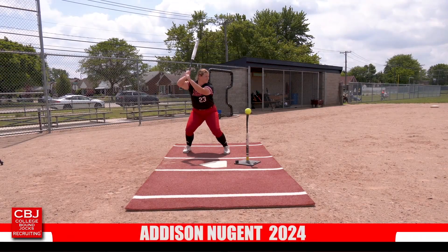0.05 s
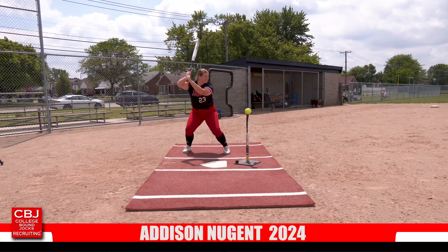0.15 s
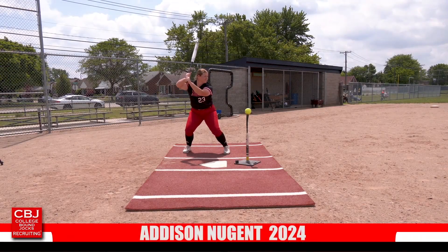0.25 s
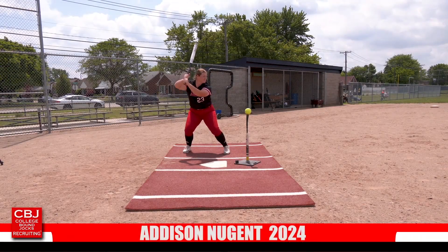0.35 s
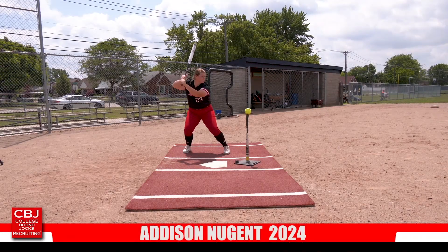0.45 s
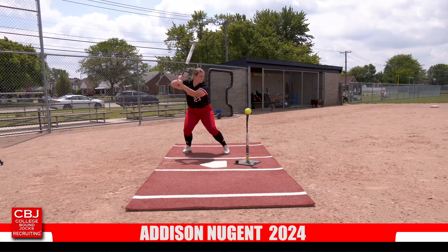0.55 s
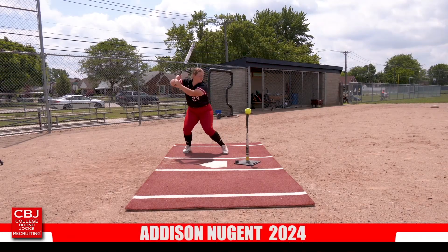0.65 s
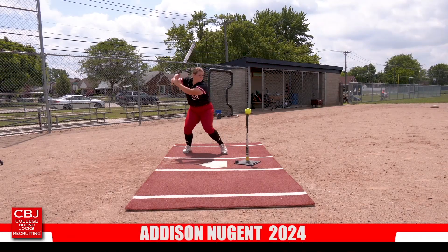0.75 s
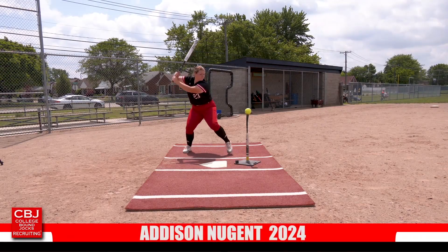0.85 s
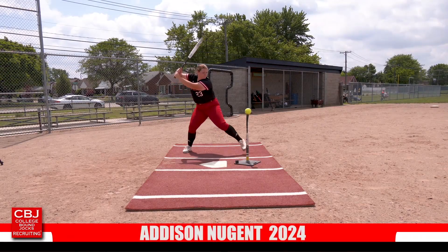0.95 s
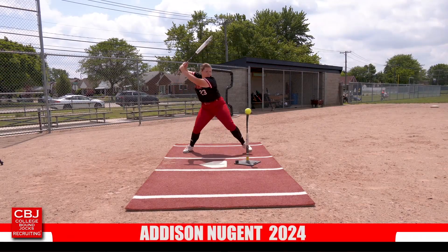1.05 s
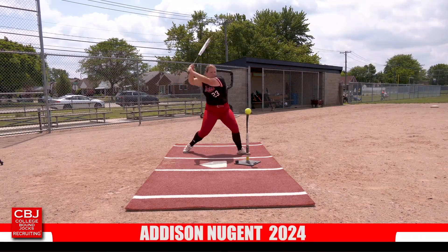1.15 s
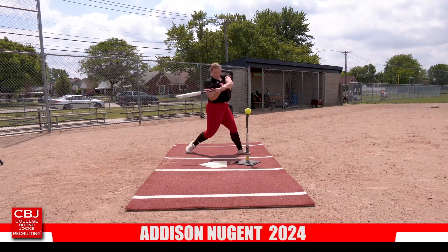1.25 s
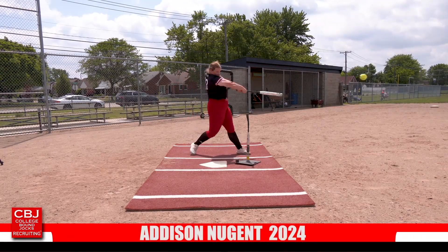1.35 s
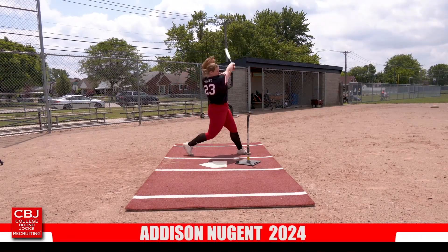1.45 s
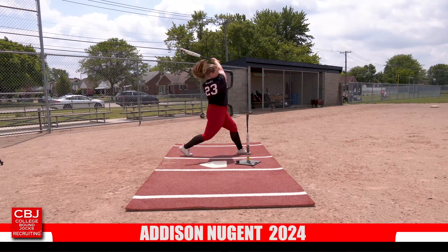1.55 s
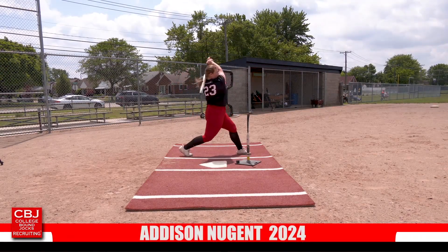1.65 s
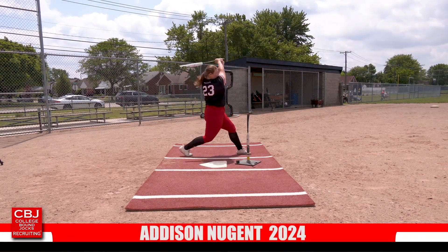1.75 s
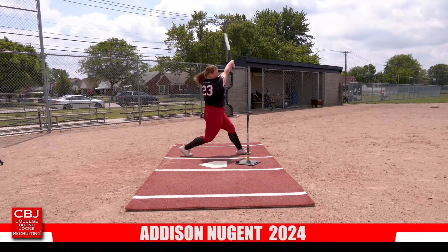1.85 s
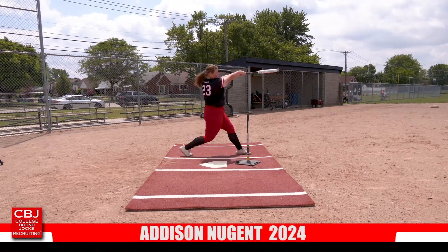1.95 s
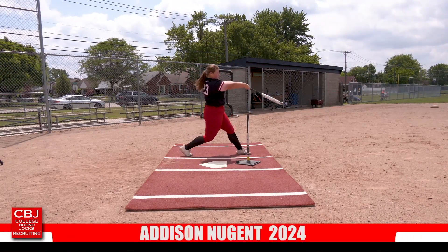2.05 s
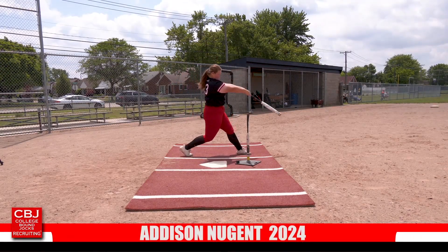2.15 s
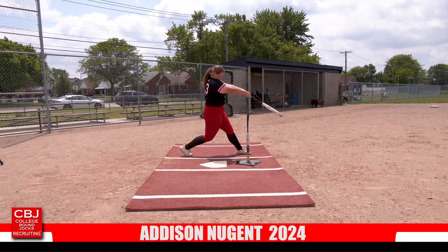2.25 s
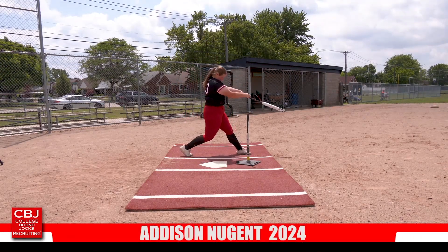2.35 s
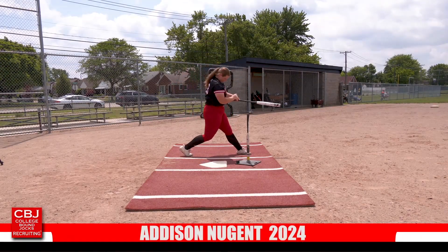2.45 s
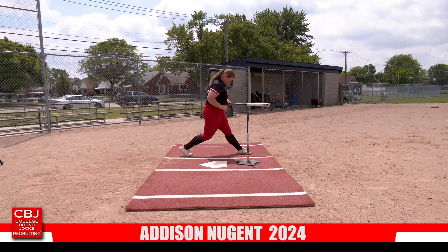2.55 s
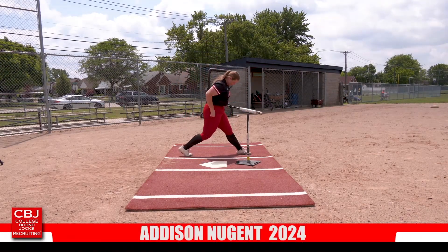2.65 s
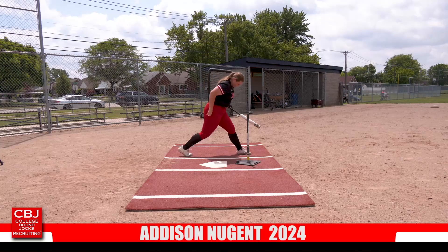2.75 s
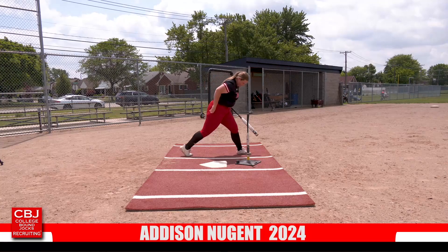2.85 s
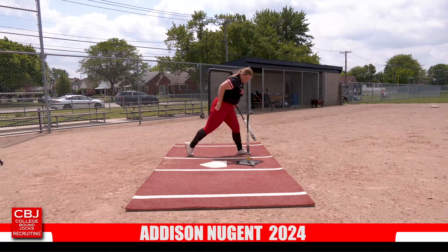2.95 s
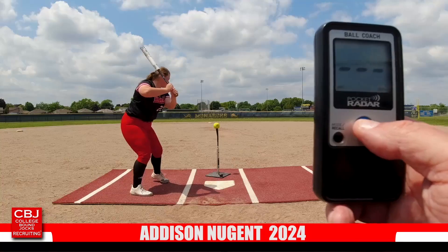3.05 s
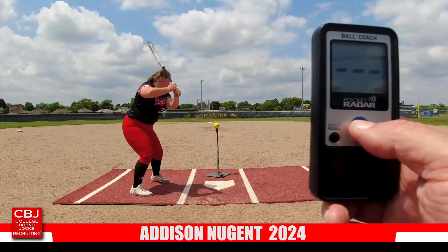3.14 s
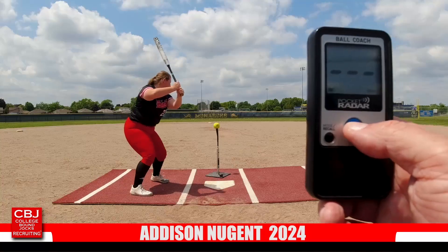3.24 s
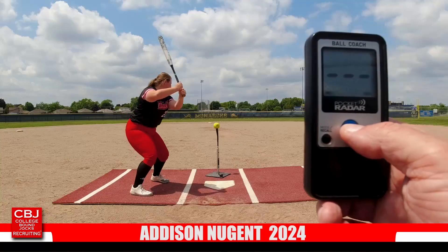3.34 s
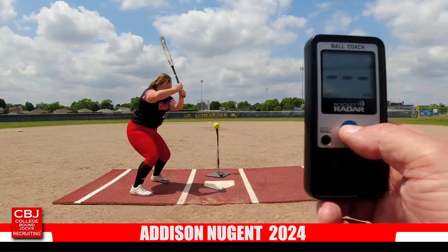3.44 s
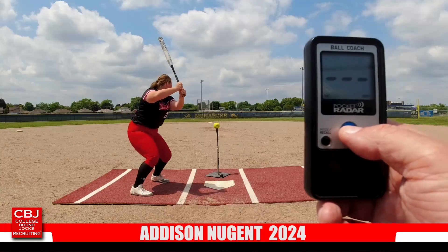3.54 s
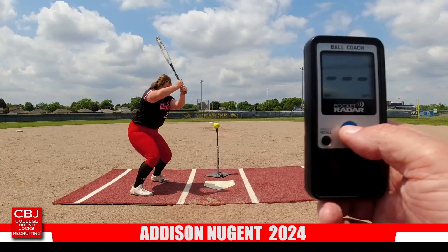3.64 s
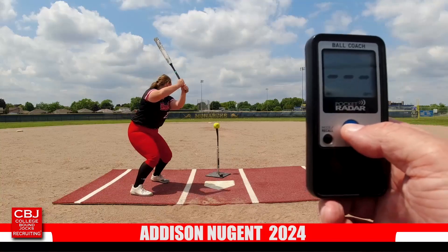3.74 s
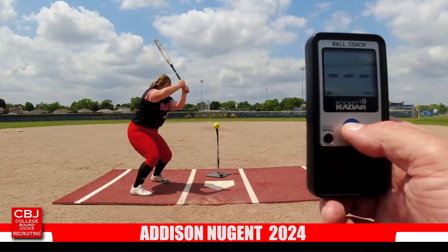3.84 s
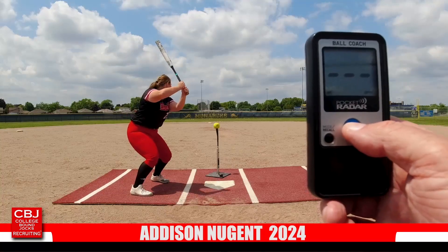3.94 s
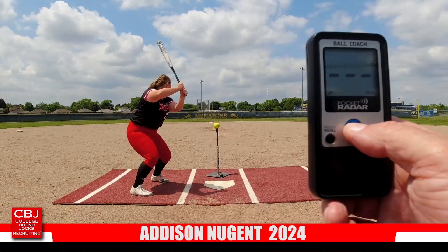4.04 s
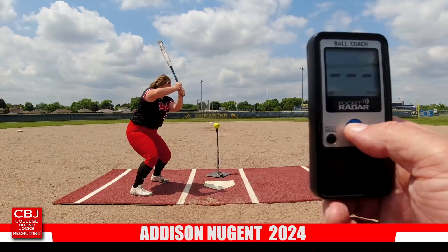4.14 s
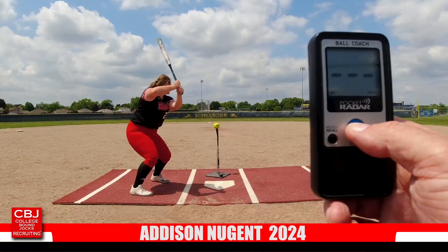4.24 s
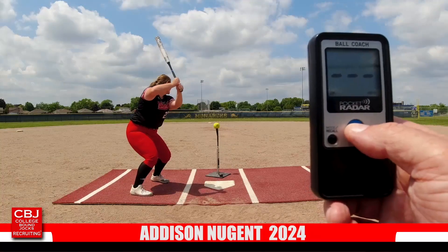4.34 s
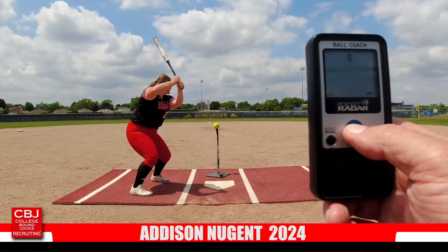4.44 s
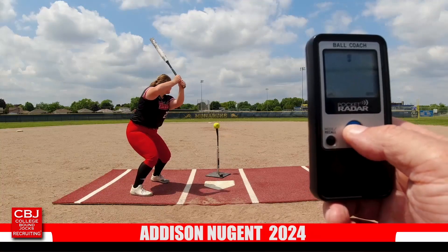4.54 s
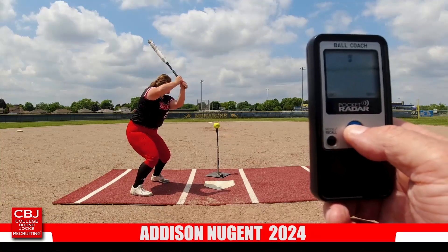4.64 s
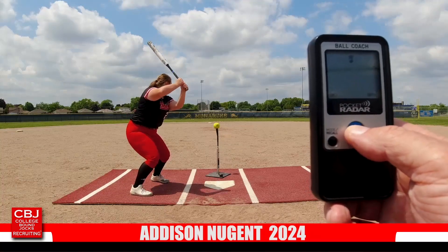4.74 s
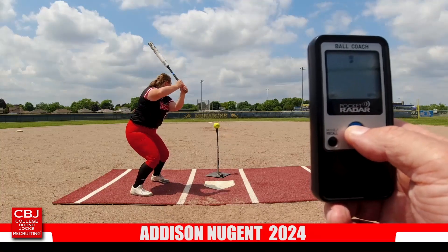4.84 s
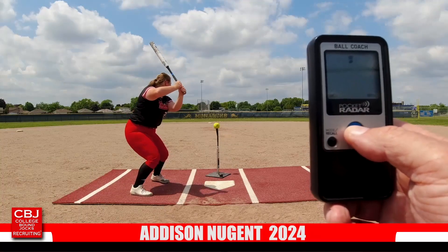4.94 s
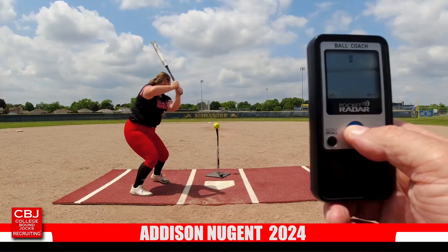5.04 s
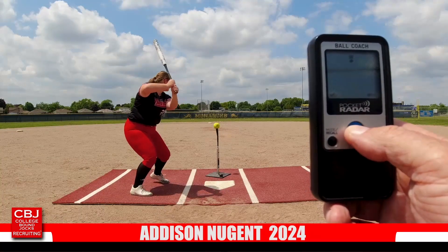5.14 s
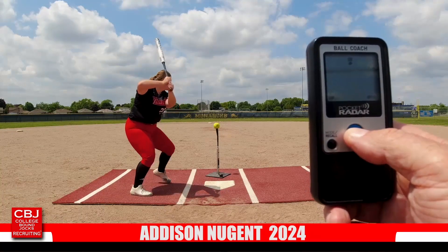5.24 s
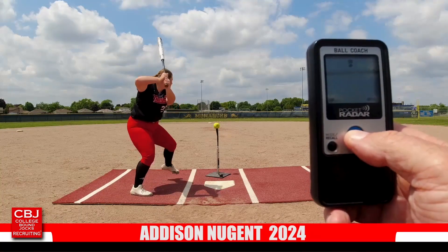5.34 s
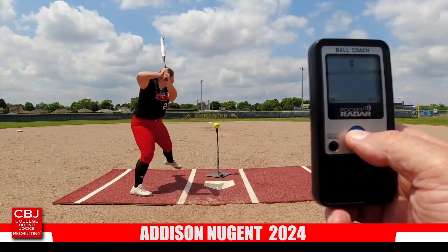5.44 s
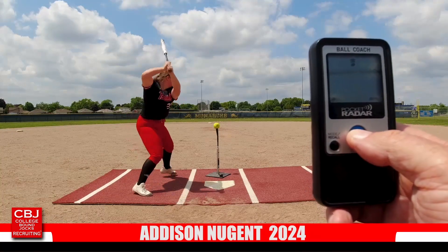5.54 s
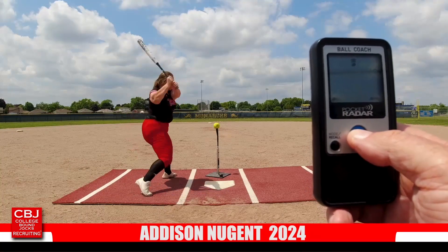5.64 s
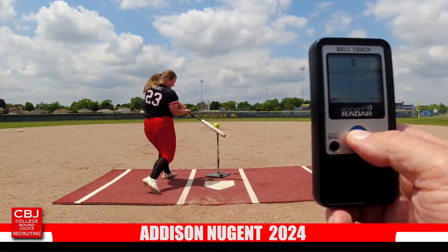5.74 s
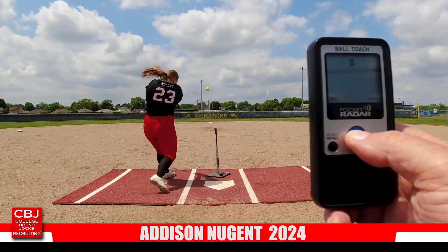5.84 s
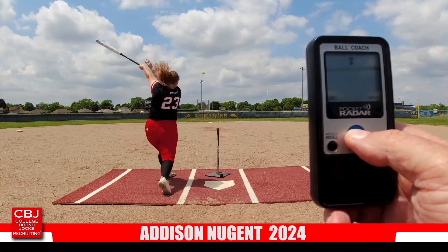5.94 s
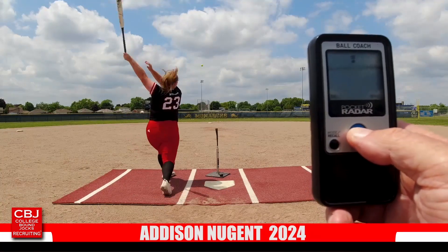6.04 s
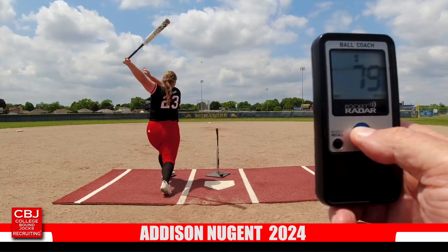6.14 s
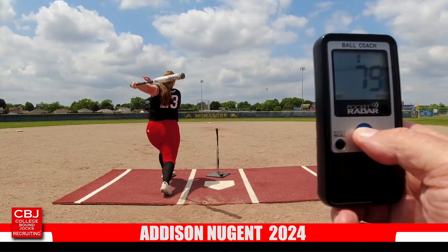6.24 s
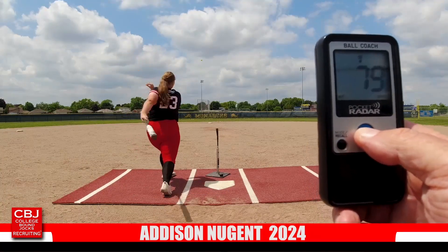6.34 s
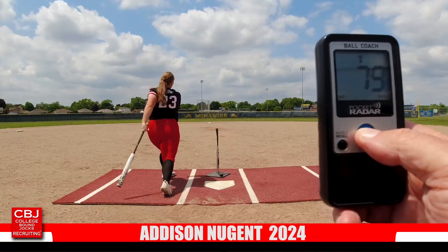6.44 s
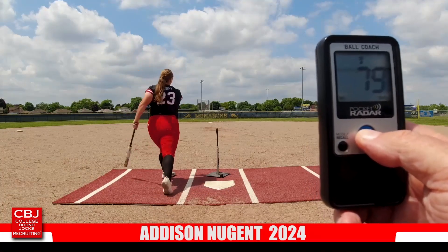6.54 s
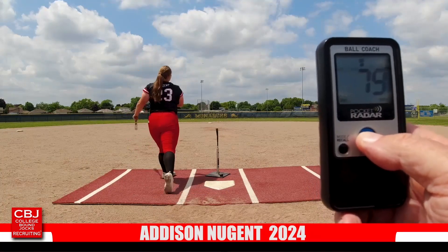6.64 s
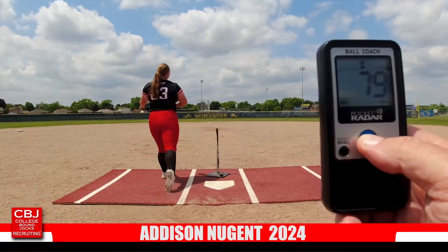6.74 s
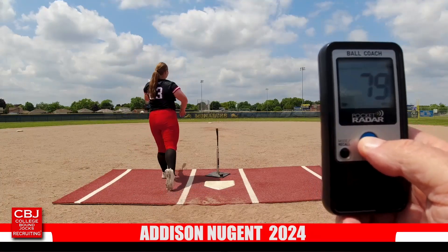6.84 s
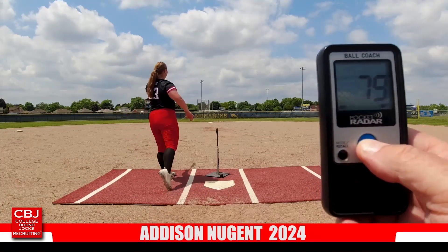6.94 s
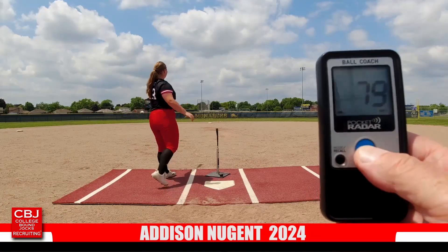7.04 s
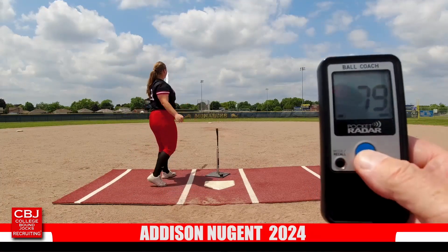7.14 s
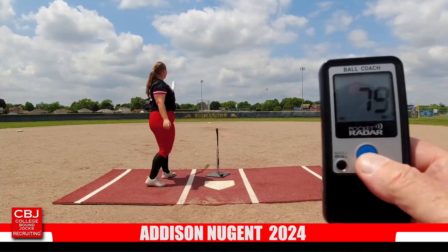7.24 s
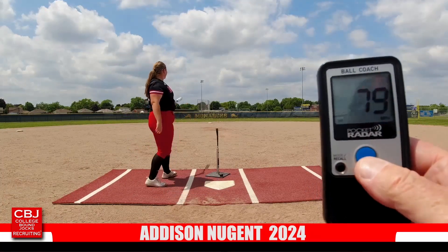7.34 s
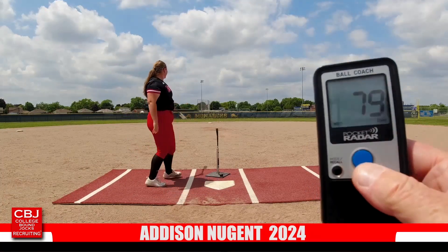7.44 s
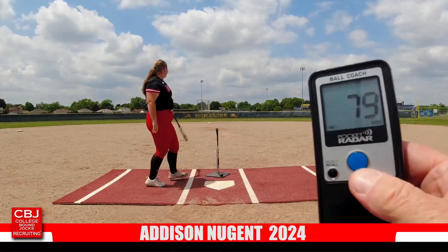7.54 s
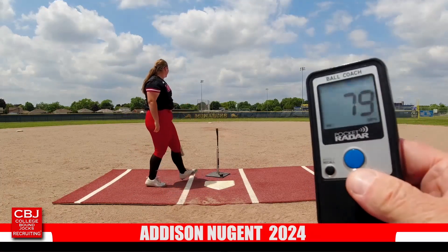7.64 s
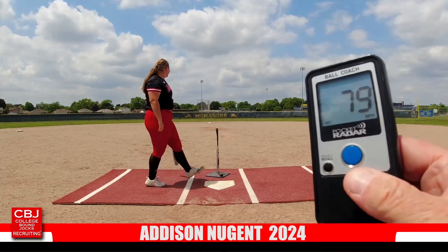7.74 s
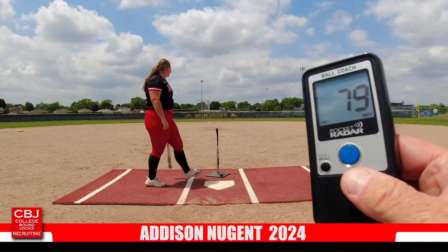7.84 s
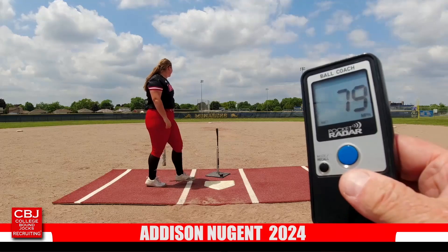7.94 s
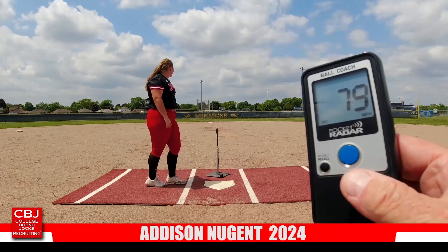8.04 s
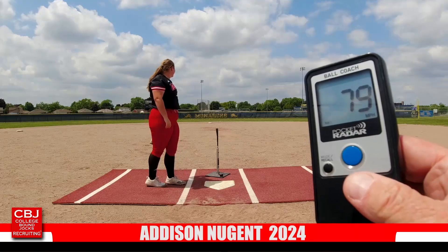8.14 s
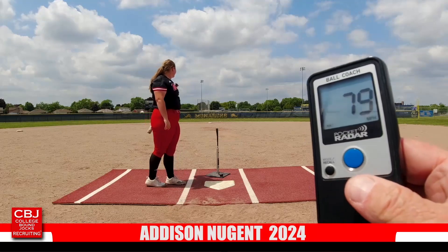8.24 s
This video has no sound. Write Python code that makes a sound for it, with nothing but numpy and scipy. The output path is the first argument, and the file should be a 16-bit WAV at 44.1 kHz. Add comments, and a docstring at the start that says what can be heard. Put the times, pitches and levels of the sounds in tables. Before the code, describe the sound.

Outdoors, a nearby batter rustles and scuffs, then strikes a ball with a sharp hollow crack that slaps back from a wire fence and ribbed wall. Aircraft rumble dies away, leaving soft traffic, leaf rustle and hiss. Birds call more often before and after a second, less pinging hit. Light ticks follow, and late gusts buffet the microphone's two sides unevenly.

```python
"""A bat cracks a softball off a tee twice on an open field: ringing modes plus bursts of coloured noise.
A wire fence, a ribbed shelter wall and far buildings answer with short tones and dulled copies of the crack.
An aircraft fades over distant traffic, both made of shaped noise; birds whistle and chirp as gliding tones.
Shoes and clothes tick and rustle as noise, and late gusts thump the two microphone ports with low pulses."""
import sys
import numpy as np
from scipy import signal
from scipy.fft import rfft, irfft, next_fast_len
from scipy.io import wavfile
from scipy.ndimage import uniform_filter1d, map_coordinates

SR = 44100
rng = np.random.default_rng(int(sys.argv[2]) if len(sys.argv) > 2 else 0)


def store_wav(level_fs):
    """Save 16-bit WAV to argv[1]."""
    pcm = np.round(np.clip(np.atleast_2d(level_fs), -1, 1) * 32767)
    wavfile.write(sys.argv[1], SR, pcm.T.astype(np.int16))


N = 365324

# In all tables t60_s is the time in which a sound falls by 60 dB.
# The two bat blows: start_s, barrel_db, overtones_db, shell_ping_db, crack_db, fence_slap_db, fence_ring_db,
# scatter_db, field_tail_db
BLOWS = [(1.3672, -9, -3, 1.5, -15, -17, -20.5, -42.5, -39),
         (5.8214, -9.5, -1, -14, -14.5, -13.5, -38, -40, -38)]
# How alike far noise is at left and right: pitch_hz, likeness (1 = the same)
ALIKE = [(60, 1.0), (180, 1.0), (550, 1), (1650, 0.96), (4970, 0.78), (15000, -0.16)]
# Turns one row into opposite values for left and right
LEFT_RIGHT = np.array([[1], [-1]])


def amp(db):
    """Gain of a level in dB."""
    return 10 ** (np.asarray(db) / 20)


def unit(x):
    """Scales x to an average strength (rms) of 1."""
    return x / np.sqrt(np.mean(x ** 2) + 1e-20)


def along(points, hz):
    """Reads a curve of (Hz, value) points on a logarithmic pitch axis."""
    f, v = np.transpose(points)
    return np.interp(np.log(hz + 1), np.log(f + 1), v)


def over_time(rows):
    """Turns (s, value) rows into one value per sample."""
    s, values = np.transpose(rows)
    return np.interp(np.arange(N) / SR, s, values)


def wobble(rate, size=N):
    """A smooth random curve through `rate` random points a second."""
    points = rng.standard_normal(int(size * rate / SR) + 4)
    return map_coordinates(points, [np.arange(size) * rate / SR])


def filtered(x, response):
    """Multiplies the spectrum of x by a response to frequency."""
    m = next_fast_len(x.shape[-1] + 8192)
    spectrum = rfft(x, m) * response(np.fft.rfftfreq(m, 1 / SR))
    return irfft(spectrum, m)[..., :x.shape[-1]]


def add(out, s, x):
    """Mixes x into out from time s."""
    part = out[..., round(s * SR):][..., :x.shape[-1]]
    part += x[..., :part.shape[-1]]


def glide(hz):
    """A sine tone that follows a pitch curve."""
    return np.sin(2 * np.pi * np.cumsum(hz) / SR)


def rush(spectrum, alike, patchy_db):
    """Stereo noise of rms 1 whose gain varies at random in patches of time and pitch."""
    z = signal.stft(rng.standard_normal((2, N)), nperseg=512)[2]
    patches = uniform_filter1d(rng.standard_normal(z.shape[1:]), size=6, axis=0)
    patches = uniform_filter1d(patches, size=14, axis=1)
    noises = signal.istft(z * amp(patchy_db * unit(patches)), nperseg=512)[1][:, :N]

    def mid_side(hz):
        # the less alike the two sides, the more noise goes into their difference
        turn = np.arccos(np.clip(along(alike, hz), -1, 1)) / 2
        return amp(along(spectrum, hz)) * [np.cos(turn), np.sin(turn)]

    mid, side = filtered(noises, mid_side)
    return unit(np.array([mid + side, mid - side]))


def ring(modes, t):
    """Struck modes die away, each with its own pitch, speed and slightly random level."""
    return sum(amp(db + rng.normal(0, 1.0) - 60 * t / t60) * np.sin(2 * np.pi * hz * t)
               for hz, db, t60 in modes)


def burst(spectrum, t60, t):
    """Coloured noise starts at once and falls by 60 dB in t60 seconds."""
    noise = filtered(rng.standard_normal(len(t)), lambda hz: amp(along(spectrum, hz)))
    return unit(noise) * amp(-60 * t / t60)


def aircraft():
    """A far roar; its copy off the ground arrives late and combs it into bands."""
    # Level before a small wobble: time_s, level_db
    level = [(0, -43.5), (.35, -36), (.8, -43.5), (1.3, -40), (1.6, -46), (1.9, -45), (2.5, -47.5),
             (3.1, -54.5), (3.6, -66), (8.3, -74.5)]
    # Colour before combing: pitch_hz, relative level_db per Hz
    colour = [(24, -51), (40, -34), (146, 3), (267, -1), (371, -1.5), (458, -5), (567, -4), (2000, -39),
              (2600, -64.5), (4400, -120)]
    roar = rush(colour, ALIKE, patchy_db=2.0)
    ground_gain, ground_delay_s = 0.56, 0.005445
    combed = filtered(roar, lambda hz: 1 + ground_gain * np.exp(-2j * np.pi * hz * ground_delay_s))
    return amp(over_time(level) + 0.63 * wobble(11.4)) * unit(combed)


def traffic():
    """Distant traffic hums as a low, slowly changing noise."""
    # Level before a small wobble: time_s, level_db
    level = [(0, -49.5), (1.4, -49), (1.6, -46), (3, -48), (4, -47), (5, -47), (5.8, -45.5), (6, -48.5),
             (6.5, -45.5), (7.5, -46), (8.3, -46)]
    # Colour: pitch_hz, relative level_db per Hz
    colour = [(15, -68.5), (25, -37), (80, -4.5), (134, -2.5), (318, -9.5), (421, -12.5), (547, -12.5),
              (724, -16.5), (902, -15.5), (1080, -20.5), (3000, -43.5), (3900, -43), (6600, -120)]
    return amp(over_time(level) + 0.13 * wobble(13.0)) * rush(colour, ALIKE, patchy_db=1.5)


def leaves():
    """Leaves rustle as a noise richer in treble than the traffic, the same at both sides."""
    # Level before a small wobble: time_s, level_db
    level = [(0, -71), (1, -70.5), (1.6, -65), (2.3, -74), (3, -69.5), (3.15, -63.5), (4, -64.5),
             (5, -63.5), (6.3, -65), (6.9, -61.5), (7.6, -65.5), (8.3, -64)]
    # Colour: pitch_hz, relative level_db per Hz
    colour = [(880, -24), (1500, -4.5), (2710, -6.5), (3580, -5), (5980, -5.5), (7240, -8), (9650, -22),
              (12000, -40), (15600, -43), (22000, -120)]
    return amp(over_time(level) + 0.21 * wobble(13)) * rush(colour, [(3000, 1.0)], patchy_db=1.0)


def movement():
    """Gain of the cloth noise: each swing, the small rustles and a resting level."""
    # Stride, swish and follow-through: time_from_blow_s, level_db
    swing = [(-.42, -84.5), (-.3, -63), (-.07, -58.5), (0, -47), (.15, -60), (.45, -71), (.85, -86)]
    # Small rustles: middle_s, time_to_fall_12_db_s, level_db
    small_rustles = [(.87, 0.2, -70), (1.95, 0.16, -71), (2.8, .2, -68.5), (3.4, 1.8, -79), (6.9, 0.3, -69),
                     (8.1, 0.23, -63.5)]
    rest_db = -83.5
    t = np.arange(N) / SR
    s, db = np.transpose(swing)
    swings = sum(amp(np.interp(t - blow[0], s, db, -120, -120)) for blow in BLOWS)
    rustles = sum(amp(db - 12 * abs(t - s) / fall) for s, fall, db in small_rustles)
    return swings + amp(rest_db) + rustles


def cloth():
    """Moving clothes make a flickering noise, the same at both sides."""
    # Colour: pitch_hz, relative level_db per Hz
    colour = [(880, -29), (1500, -2), (1700, -3), (2130, 2), (2750, -4.5), (2980, -3), (7420, 0.5),
              (13000, -25)]
    return movement() * amp(1.6 * wobble(70)) * rush(colour, [(3000, 1.0)], patchy_db=0.0)


def ticks():
    """Shoes, grip and clothes touch: short dry noise bursts, each with its own colour."""
    # Contacts: start_s, level_db before the soft start, middle_over_low_db, high_over_low_db, t60_s
    contacts = [(0.127, -29.5, 2, 6.5, 0.025), (0.782, -39.5, -21, -22, .017),
                (1.099, -40.5, -17.5, -14, 0.036), (1.137, -27, -24.5, -16, 0.014),
                (1.267, -35, -10, -27, .016), (1.338, -37.5, -14.5, -21, 0.084),
                (1.645, -43, -1.5, -18, 0.029), (1.696, -36.5, 14.5, 10, 0.019), (1.727, -34, 2, 9.5, .018),
                (2.99, -41.5, -32, -6, 0.014), (5.584, -21.5, -29, -23.5, .014),
                (5.675, -39, -11.5, -9, .014), (5.776, -39, -23.5, -10, .025),
                (6.1, -36.5, -11, -22, 0.027), (6.159, -42.5, -3, -10, 0.037), (6.673, -46, -30, 7, 0.013),
                (7.205, -35.5, -1.5, -15, .014), (8.099, -42, -22.5, -7, .02)]
    out, t = np.zeros(N), np.arange(SR // 10) / SR
    soft_start = 1 - np.exp(-t / 0.0013)
    for s, db, middle_db, high_db, t60 in contacts:
        colour = [(250, -18), (900, 0), (2500, middle_db), (6000, high_db), (13000, high_db - 23.0)]
        add(out, s, amp(db) * burst(colour, t60, t) * soft_start)
    return out


def bat_blow(t, barrel_db, over_db, ping_db, crack_db):
    """The hit rings the barrel and its shell, and cracks as short noise bursts."""
    # Ringing modes of barrel, overtones and shell: pitch_hz, relative level_db, t60_s
    barrel = [(600, -12, .014), (838, -12, .09), (900, 0, .016), (967, -14, .05)]
    overtones = [(1450, -37.5, 0.04), (1750, -5.5, 0.0069), (2820, -2.5, 0.011), (4310, -4, 0.019),
                 (10400, -3, 0.0019)]
    ping = [(3630, -8, .012), (5400, -6, .01), (6200, 0, .014)]
    # Colour of the crack: pitch_hz, relative level_db per Hz
    crack = [(240, -23), (400, -40), (921, -18), (1270, -8), (1900, 0), (2150, -8), (2800, -10.5),
             (3260, -11), (6150, -4), (16000, -36)]
    # all modes start together downwards; overtones and ping are set against the barrel
    modes = ring(barrel, t) + amp(over_db) * ring(overtones, t) + amp(ping_db) * ring(ping, t)
    cracks = burst(crack, 0.029, t) + amp(-3) * burst(crack, 0.045, t)
    first_touch = burst([(3000, -14), (9000, 10), (15000, -8.0)], 0.002, t)
    blow = -amp(barrel_db) * modes + amp(crack_db) * cracks + amp(crack_db - 0.5) * first_touch
    blow = blow * (1 - np.exp(-t / 0.000048))
    # the blow carries little bass
    return filtered(blow, lambda hz: (1j * hz / (1j * hz + 300)) ** 2)


def field_tail():
    """Scattered answers of the whole field; each frequency dies at its own speed."""
    # Colour of the tail: pitch_hz, relative level_db per Hz
    colour = [(350, -43), (600, -22), (834, -16), (1270, -19), (1410, -14.5), (1530, -19.5), (3950, -21),
              (6960, -18), (12900, -44), (14000, -53.5)]
    # How fast it dies: pitch_hz, t60_s
    decay = [(400, 0.11), (1400, 0.5), (4000, 0.42), (7000, 0.48), (12000, 0.14)]
    noise = rng.standard_normal(SR) + 0.21 * rng.standard_normal((2, SR))  # nearly alike left and right
    hz, t, z = signal.stft(noise, SR, nperseg=256)
    z = z * amp(along(colour, hz)[:, None] - 60 * t / along(decay, hz)[:, None])
    tail = signal.istft(z, SR, nperseg=256)[1]
    return tail / np.std(tail[:, :SR // 10])


def wire_fence(t, slap_db, mesh_db):
    """A fence answers with a short slap and tones sent back by its evenly spaced wires."""
    # Tones of the wires: pitch_hz, relative level_db, t60_s
    wires = [(6970, 1, 0.072), (7540, -4, 0.047), (7720, -7, 0.023), (8700, -6, 0.02)]
    slap = amp(slap_db) * ring([(7300, 6.5, 0.0091), (8260, 3.0, 0.0076), (8600, -1, 0.0077)], t)
    mesh = amp(mesh_db + 1.5 * wobble(200, size=len(t))) * ring(wires, t)
    return (slap + mesh) * (1 - np.exp(-t / .0003))


def far_answers(blow, scatter_db):
    """Buildings and scattered things return copies of the blow with less treble."""
    # Clear echoes: delay_s, level_db (varied a little at random), treble_limit_hz
    echoes = [(.0053, -13.5, 2500), (0.0127, -21.5, 5970), (.041, -20, 3000), (.054, -31, 5030),
              (.071, -40, 6000), (.0955, -17.5, 2800), (0.121, -23, 7000)]

    def dulled(top_hz):
        # air and rough walls eat treble
        return filtered(blow, lambda hz: 1 / (1 + 1j * hz / top_hz) ** 2)

    out = np.zeros((2, SR))
    for delay, db, top_hz in echoes:
        add(out, delay, amp(db + rng.normal(0, 1)) * dulled(top_hz))
    far = dulled(6000)
    for late, size, pan in rng.random((40, 3)):  # posts, cars and roofs all round
        db = scatter_db + 10 * size - 16.8 * late  # later answers are weaker
        add(out, 0.0046 + 0.28 * late, amp(db + 2 * (pan - 1 / 2) * LEFT_RIGHT) * far)
    return out


def bat():
    """Each blow sounds first, then fence, buildings and field answer with their own delays."""
    out, t = np.zeros((2, N)), np.arange(SR // 5) / SR
    for s, barrel_db, over_db, ping_db, crack_db, slap_db, mesh_db, scatter_db, tail_db in BLOWS:
        blow = bat_blow(t, barrel_db, over_db, ping_db, crack_db)
        add(out, s, blow)
        add(out, s + .0131, wire_fence(t, slap_db, mesh_db))
        add(out, s, far_answers(blow, scatter_db))
        clumps = amp(tail_db + 3.2 * wobble(82.2, size=SR))  # answers come in clumps
        add(out, s + 0.0043, clumps * field_tail()[:, :SR])
    return out


def ribbed_wall():
    """Evenly spaced ribs return each crack as short tones of changing pitch and level."""
    # Near and far stretch of ribs, used after both blows: delay_s, pitch_hz, relative level_db
    stretches = [
        [(.008, 1380, -40), (.024, 1385, -40), (.04, 1410, -33), (.082, 1428, -45.5), (.098, 1414, -51)],
        [(.128, 1480, -52), (.15, 1550, -45.5), (.167, 1540, -50), (.184, 1540, -56)],
    ]
    # Added to those levels, one value per blow: level_db
    blow_levels = [1, 4.5]
    out = np.zeros(N)
    for (blow_s, *_), blow_db in zip(BLOWS, blow_levels):
        for rows in stretches:
            s, hz, db = np.transpose(rows)
            t = np.arange(s[0], s[-1], 1 / SR)
            tone = glide(np.interp(t, s, hz)) * signal.windows.tukey(len(t), .15)
            level = np.interp(t, s, db) + blow_db + 1.3 * wobble(138, size=len(t))
            add(out, blow_s + s[0], amp(level) * tone)
    return out


def widened(x):
    """The body around the microphones scatters treble unevenly to the two ports."""
    # Share of a near sound that differs left and right: pitch_hz, level_db
    width = [(600, -42), (2500, -26), (6000, -18), (10000, -9), (14000, -8)]
    t = np.arange(SR // 50) / SR
    scatter = rng.standard_normal(len(t)) * amp(-60 * t / 0.025)
    side = signal.fftconvolve(x.mean(0), scatter / np.linalg.norm(scatter))[:N]
    side = filtered(side, lambda hz: amp(along(width, hz)))
    return x + [side, -side]


def echoed(x, db, t60):
    """Adds a wash of echoes from trees and one clear answer from a house wall."""
    t = np.arange(SR // 3) / SR
    echo = rng.standard_normal((2, len(t))) * amp(-60 * t / t60)
    wash = signal.fftconvolve(x[None], echo / np.linalg.norm(echo[0]), axes=1)[:, :N]
    wall = amp(-14.0) * np.pad(x, (round(.16 * SR), 0))[:N]
    return x + wall + amp(db) * wash


def pairs():
    """Notes of a two-note call: a high level note, then a lower one that rises."""
    # Calls: start_s, first_length_s, first_level_db, second_starts_after_s, second_level_db
    calls = [(.406, 0.07, -58, 0.073, -57), (2.177, 0.048, -56, .081, -61),
             (3.793, 0.03, -56.5, 0.067, -59), (5.298, .039, -58, 0.076, -63),
             (6.131, 0.048, -60, 0.036, -57), (8.12, .044, -60, 0.078, -62)]
    notes = []
    for s, length, db, gap, second_db in calls:
        # each note: start s, length s, pitch Hz, bend Hz, level dB
        notes.append((s, length, 4550, -60, db))
        notes.append((s + gap, .048, 3580, 935, second_db))
    return notes


def chatter():
    """Notes of a far flock: faint chirps at random moments."""
    when, long, pitch, bend, size = rng.random((45, 5)).T
    hz = 2500 + 2200 * pitch
    bend_hz = hz * 0.17 * (bend - 1 / 2)
    return np.transpose([2.2 + 6 * when, 0.0194 + 0.039 * long, hz, bend_hz, -73 + 6 * size])


def chirps(notes, warble):
    """Hoarse notes scooped at the start, bending late and warbling the more, the wider they bend."""
    out = np.zeros(N)
    for s, length, pitch_hz, bend_hz, db in notes:
        u = np.arange(round(length * SR)) / (length * SR)  # 0 to 1 along the note
        scooped = pitch_hz * (1 - 0.113 * np.exp(-u / 0.081))
        shake = (40 + warble * abs(bend_hz)) * wobble(225.0, size=len(u))
        swell = np.sin(np.pi * u) ** .55 * amp(3.5 * wobble(200, size=len(u)))
        add(out, s, amp(db) * swell * glide(scooped + bend_hz * u ** 3 + shake))
    return echoed(out, db=-1.5, t60=0.47)


def whistles():
    """Clear notes that climb ever faster, swell, flick up and hold the top for a moment."""
    # Notes: start_s, climb_s, start_hz, top_hz, level_db before the swell
    notes = [(4.414, .047, 1990, 3300, -62), (4.703, 0.058, 1920, 3200, -61),
             (4.975, .078, 1820, 3000, -58.5), (5.227, 0.082, 1760, 3070, -56.5),
             (5.459, .115, 1700, 3360, -58.5), (6.014, 0.07, 1900, 3330, -61),
             (6.253, 0.057, 2010, 3450, -57.5), (6.407, .051, 2080, 3450, -59),
             (6.666, .038, 2210, 3450, -56.5), (6.898, 0.047, 2260, 3500, -57),
             (7.137, .055, 2080, 3480, -59), (7.205, 0.079, 1780, 3370, -57.5),
             (7.425, 0.1, 1720, 3450, -57), (7.685, 0.084, 1760, 3160, -56),
             (7.914, 0.1, 1710, 3380, -55.5)]
    flick_s, hold_s = 0.027, 0.011  # a shorter flick makes the end of the climb steeper
    out = np.zeros(N)
    for s, climb, start_hz, top_hz, db in notes:
        t = np.arange(round((climb + hold_s) * SR)) / SR
        steep = 1 / (np.maximum(climb - t, 0) + flick_s)
        hz = start_hz + (top_hz - start_hz) * (steep - steep[0]) / (steep[-1] - steep[0])
        u = t / (climb + hold_s)
        swell_db = 8.3 * (u - 1) - 3.4 * u ** 8 + 1.9 * wobble(147, size=len(t))
        add(out, s, amp(db + swell_db) * signal.windows.tukey(len(t), .25) * glide(hz))
    return echoed(out, db=-10, t60=.3)


def gusts():
    """Wind on the ports: lumpy buffeting, partly unlike from side to side, and single low thumps."""
    # Level of the buffeting: time_s, level_db
    wind = [(6.6, -65), (6.78, -47), (6.93, -35.5), (7.05, -48), (7.5, -62.5), (7.75, -46), (7.95, -39),
            (8.28, -33)]
    # Its colour: pitch_hz, relative level_db per Hz
    colour = [(15, -42), (30, -16), (50, -4.5), (110, -2.5), (160, -6), (410, -21.5), (900, -37),
              (1500, -94)]
    # Single thumps: middle_s, level_db, pitch_hz, left_minus_right_db
    thumps = [(6.898, -29, 126, 1), (6.925, -30, 104, 9.5), (6.968, -33, 172, -9), (7.677, -31, 207, -2),
              (7.688, -30, 207, 0), (7.91, -33, 220, 0), (7.955, -29, 150, 4), (8.035, -27, 170, 5),
              (8.084, -33, 75, -6), (8.118, -25, 125, 5), (8.25, -28.5, 150, 2), (8.275, -33, 60, 2.5)]
    thump_cycles = 1.1  # width of a thump in cycles of its pitch
    lumps = amp(3.4 * np.array([wobble(25), wobble(25)]))
    level = np.interp(np.arange(N) / SR, *np.transpose(wind), left=-120)
    out = amp(level) * unit(lumps * rush(colour, [(100, 0.51)], patchy_db=0.0))
    t = np.arange(-SR // 20, SR // 20) / SR
    for (s, db, hz, pan_db), (phase, skew) in zip(thumps, rng.random((len(thumps), 2))):
        turn = 2 * np.pi * (hz * t + phase) + LEFT_RIGHT * 1.37 * skew
        hump = np.exp(-(t * hz / thump_cycles) ** 2)
        add(out, s + t[0], amp(db + pan_db * LEFT_RIGHT / 2) * hump * np.sin(turn))
    return out


def scene():
    """All sources meet at the microphones."""
    # Single hoarse chirps: start_s, length_s, pitch_hz, bend_hz, level_db
    single_chirps = [(2.8, 0.068, 2600, -40, -68.5), (3.013, .044, 4520, -1100, -55.5),
                     (3.192, 0.032, 4600, -300, -62), (3.229, .043, 3500, -430, -63.5),
                     (4.019, .028, 3650, 100, -64), (5.65, 0.037, 2620, -40, -57),
                     (6.715, .054, 4600, -91, -65), (6.76, 0.024, 2310, 320, -61),
                     (6.788, 0.042, 3440, -12, -59), (6.984, 0.043, 2350, 66, -60),
                     (7.035, 0.028, 3400, -190, -61), (7.358, 0.057, 2770, -10, -63),
                     (7.376, .031, 4400, 160, -63), (7.427, .041, 3630, -350, -63),
                     (7.41, 0.15, 2380, -40, -65), (7.816, 0.089, 2950, -310, -64),
                     (7.997, 0.12, 2410, -380, -67)]
    background = aircraft() + traffic() + leaves() + cloth()
    near = widened(ticks() + bat() + ribbed_wall())
    song = chirps(single_chirps + pairs(), warble=0.095) + chirps(chatter(), warble=0.293) + whistles()
    return background + near + song + gusts()


def record(dry):
    """Adds hiss partly opposite left and right; loud blows pull the gain down; a band limit cuts the top."""
    # Colour of the microphone noise: pitch_hz, relative level_db per Hz
    hiss = [(2000, -1.5), (8000, -11), (15000, -13)]
    top_hz = 15750
    # the stereo matrix gives the hiss negative likeness
    opposite = [(3000, -0.35), (9000, -0.57), (13000, -0.31)]
    heard = dry + amp(-64.5) * rush(hiss, opposite, patchy_db=-0.5)
    # energy of the last moments, forgotten over about 0.3 s
    recent = signal.lfilter([1 / SR], [1, -np.exp(-1 / (SR * .3))], heard.mean(0) ** 2)
    heard = heard * amp(-5 * recent / (recent + 0.00022))  # at most 5 dB down
    return filtered(heard, lambda hz: np.clip((top_hz - hz) / 300 + 1 / 2, 0, 1))


dry = scene()
out = record(dry)
store_wav(out)
```